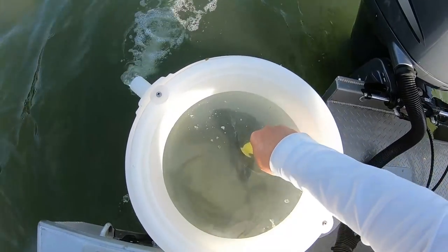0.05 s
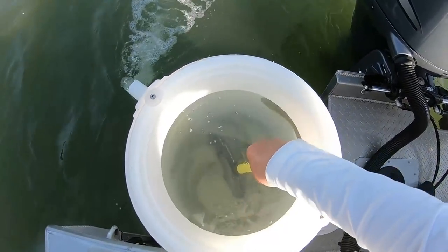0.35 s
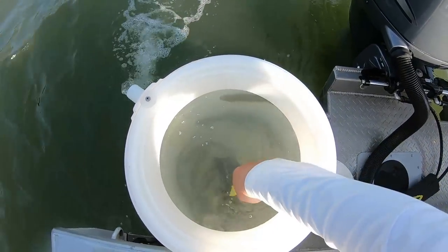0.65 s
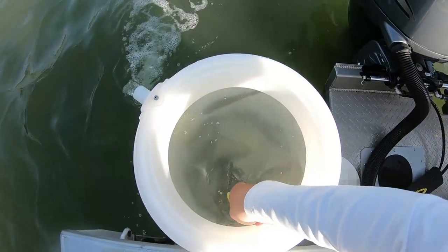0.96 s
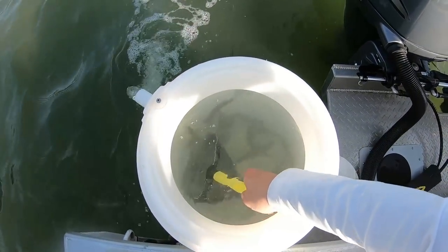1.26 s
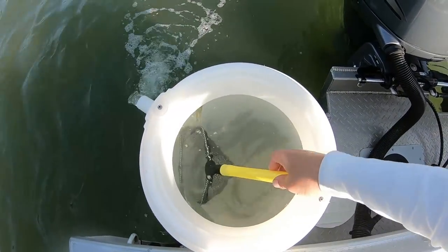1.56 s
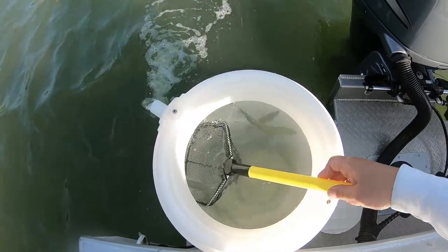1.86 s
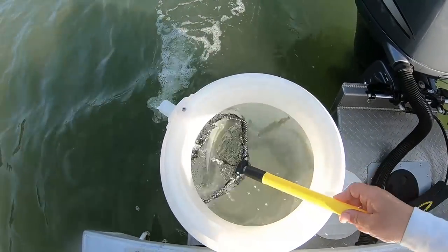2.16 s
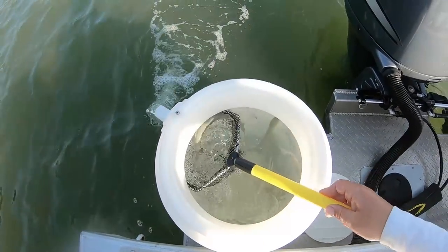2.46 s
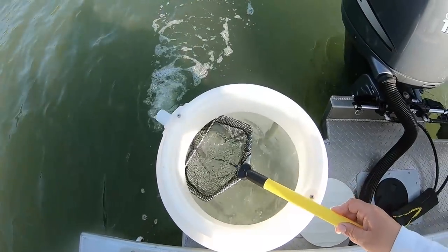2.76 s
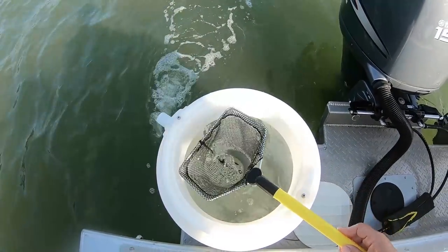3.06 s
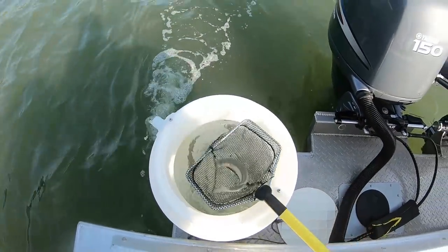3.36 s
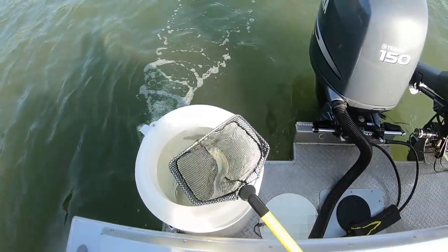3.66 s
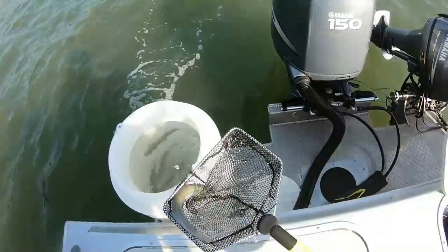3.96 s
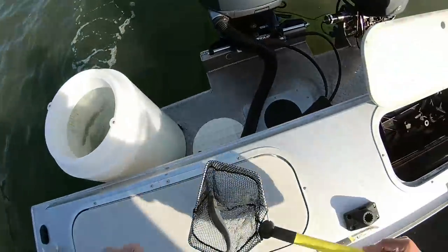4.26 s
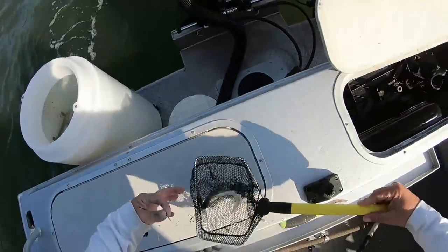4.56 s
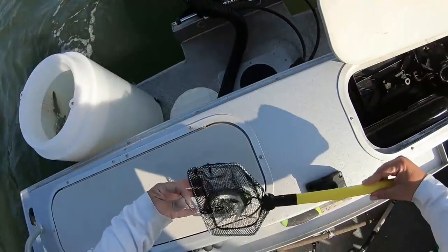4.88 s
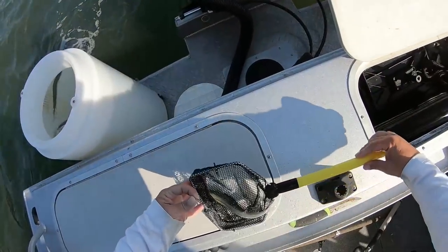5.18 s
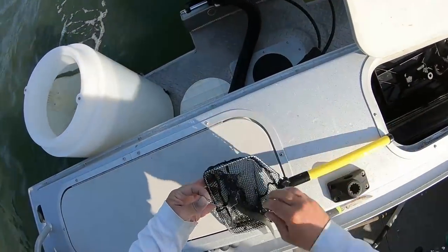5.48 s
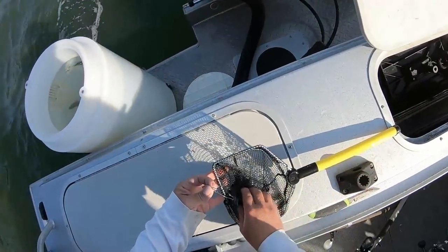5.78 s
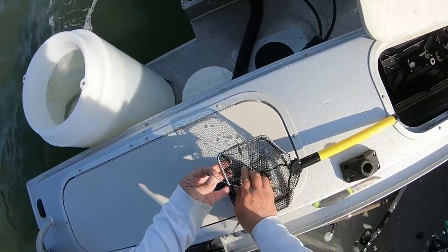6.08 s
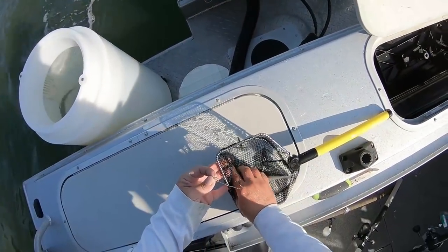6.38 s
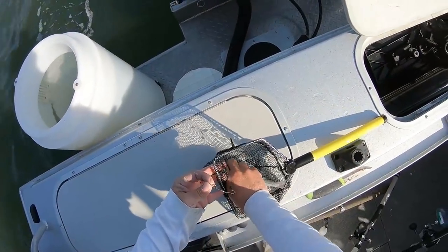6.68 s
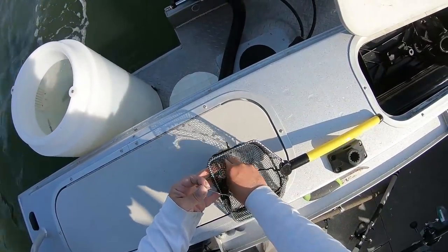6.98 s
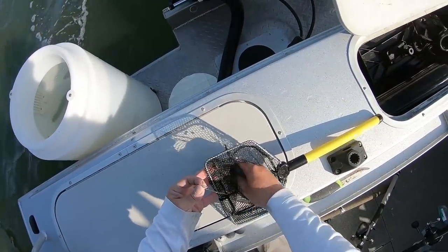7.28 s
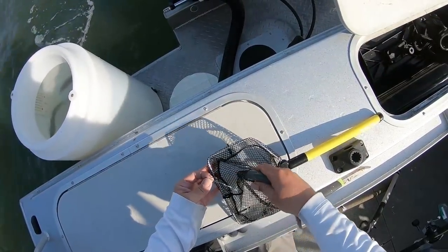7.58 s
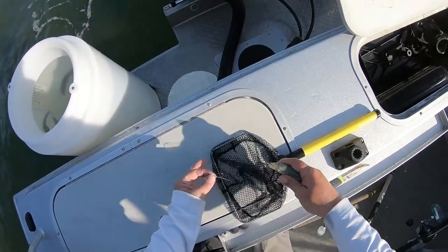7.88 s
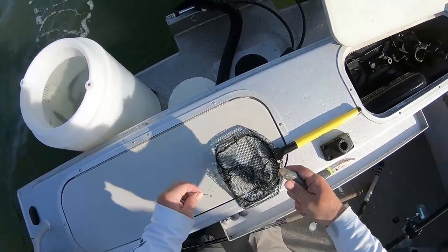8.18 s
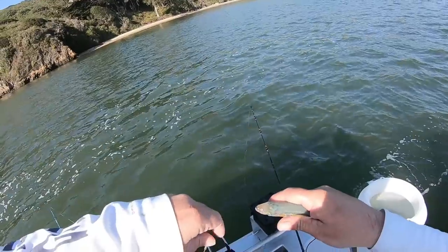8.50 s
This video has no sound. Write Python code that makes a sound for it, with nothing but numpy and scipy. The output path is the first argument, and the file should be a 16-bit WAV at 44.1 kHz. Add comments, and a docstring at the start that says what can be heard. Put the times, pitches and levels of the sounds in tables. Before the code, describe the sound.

Boat engines idle with a low hum that slowly swells and fades, and wind gusts on the microphone. Close by, a hand net scoops small fish from a bait bucket with splashes, drips and little plops. After about four seconds the water settles. The net clicks, rustles and knocks on the hollow deck, and the hull thumps softly twice, over faint lapping and the patter of the bucket's overflow.

```python
"""Two boat engines idle at nearly the same speed, so their hum beats; wind buffets the microphone,
water laps on the hull and the overflow of a bait bucket patters into the sea. From the first moment
a hand net scoops small fish from the bucket: drops splash, trapped air plops and the net knocks the
bucket once. After four seconds the water settles; the net clicks, rustles and knocks on the resonant
deck, and the hull thumps softly twice. A smooth hiss of open water enters at the very end."""
import sys
import numpy as np
from scipy import signal
from scipy.fft import rfft, irfft, next_fast_len
from scipy.io import wavfile
from scipy.ndimage import map_coordinates

SR = 44100
rng = np.random.default_rng(int(sys.argv[2]) if len(sys.argv) > 2 else 0)


def transcribe(u):
    """Save the signal u as a 16-bit wav file named by the first command-line argument.

    u: samples, shape (n,) or (channels, n), limited to [-1, 1]; the rate is SR.
    q: integer samples, one column per channel.
    """
    v = np.clip(np.atleast_2d(u).T, -1, 1)
    q = np.round(v * 32767).astype(np.int16)
    wavfile.write(sys.argv[1], SR, q)


N = 385434

# partials of the exhaust hum: firing_multiple, level_db
HUM_PARTIALS = [(.6667, -21), (1, 1.05), (1.6667, -15.5), (2, -14), (3, -21.5), (5, -32.5), (5.3333, -37),
                (6.3333, -43.5)]
# lulls of the hum, where the engines are half a firing cycle apart: time_s
HUM_LULLS = [-.7, .77, 2.04, 3.5, 4.68, 6.19, 7.72, 9.3]
# gusts over the breeze: start_s, hold_s, rise_db
GUSTS = [(0.605, 0.073, 10), (0.978, .06, 8.5), (1.62, 0.015, 11.5), (2.27, 0.32, 7.5), (3.612, 0.55, 11)]
# spectrum of the wind's eddies: frequency_hz, gain_db
EDDY_SPECTRUM = [(15, -14), (35, -1), (90, 3.5), (160, -0.5), (240, -12), (350, -19), (1200, -80)]
# how much the water is stirred close by: time_s, share (0-1)
STIRRING = [(0, 0.85), (2.3, 0.83), (3.4, 0.93), (3.9, 0.42), (4.4, 0.28), (8.74, 0.24)]
# water lapping on the hull: time_s, level_db
LAPPING_LEVELS = [(4.4, -48), (5.1, -45), (5.7, -47.5), (6.3, -44.5), (7.1, -47), (7.7, -45.5)]
# spectrum of the lapping: frequency_hz, gain_db
LAPPING_SPECTRUM = [(150, -26), (304, -2), (500, -5.5), (740, -4), (1340, -11.5), (1600, -16), (3000, -68)]
# the net drags air under: centre_s, length_s, rise_db
GURGLES = [(0.303, 0.054, 3), (1.877, 0.32, 2.5), (2.415, 0.16, 8)]
# the net breaks the surface and sheds water: centre_s, length_s, rise_db
SPRAY_SURGES = [(1.202, 0.16, 3), (1.818, 0.039, 6), (1.991, 0.052, 4.5), (2.345, 0.28, 6.5),
                (2.843, 0.037, 5), (2.949, 0.022, 5.5), (3.36, 0.067, 7)]
# spectrum of the overflow: frequency_hz, gain_db
OVERFLOW_SPECTRUM = [(590, -21), (1150, -9), (1360, -3), (2010, -1), (3300, -4.5), (3790, 1.5), (4190, 0.5),
                     (4870, -10), (5750, -11.5), (7320, -22), (9520, -40.5), (16100, -61.5)]
# spectrum of near splashes, with the recorder's faint treble peak at 13 kHz: frequency_hz, gain_db
SPLASH_SPECTRUM = [(710, -40), (1200, -17), (1900, -11), (2780, -17), (4090, 0.5), (5050, -2.5),
                   (5880, -6.5), (7320, -29), (11000, -50), (13000, -38), (16100, -58)]
# drops from the wet mesh: start_s, level_db, pitch_hz, deep_splash_relative_db
DROPS = [(0.1515, -20.5, 4700, -13), (0.2040, -22.5, 4100, -15), (0.259, -22.5, 3720, -11),
         (0.3296, -21, 4330, -15), (0.3690, -20, 3870, -21), (0.539, -18, 4810, -35),
         (.569, -23, 4970, -25), (0.6692, -13, 4920, -28), (0.7669, -22.5, 4870, -33),
         (1.092, -23, 3900, -14), (1.356, -21, 4790, -22), (1.496, -22, 4300, -20), (1.711, -23, 4800, -11),
         (1.896, -22, 4100, -6), (2.0943, -19, 3900, -20), (2.2510, -22, 4170, -27),
         (2.307, -19, 4300, -30), (2.3173, -15, 5070, -26), (2.5247, -19.5, 4240, -11),
         (2.6325, -16, 2850, -24), (3.012, -21, 4800, -25), (3.1265, -17, 4270, -24),
         (3.1353, -16, 4380, -21), (3.2638, -19, 4500, -37), (3.5884, -23, 5480, -24),
         (3.652, -19.5, 4470, -33), (3.751, -27, 4020, -18), (3.79, -26, 4320, -29),
         (4.049, -26, 5450, -34), (4.2054, -22.5, 5650, -31)]
# filter on the drops: frequency_hz, gain_db
DROP_SPECTRUM = [(100, -11.5), (1500, -10.5), (3500, 3.5), (5600, 6), (7000, -9.5), (8500, -30.5),
                 (13000, -45.5), (16000, -59)]
# plops in the bucket, and one short knock of the net against it (the two rows near 0.89 s):
# start_s, level_db, pitch_hz, glide_octaves_per_s, t60_s
PLOPS_AND_KNOCK = [(.654, -37, 1745, -10, .1), (0.887, -24.5, 1103, -30.5, 0.044),
                   (.891, -27, 750, -9, 0.13), (1.044, -31, 1560, 14, 0.044),
                   (1.736, -31.5, 670, -13, 0.08), (1.933, -35, 773, 10, 0.07),
                   (1.927, -37, 1850, -13.5, 0.15), (2.23, -28, 587, -22, 0.12), (2.373, -32, 842, -2, .14),
                   (2.4453, -25, 2110, -19, 0.031), (2.452, -28, 1160, -15, 0.042),
                   (3.112, -22.5, 930, -44, 0.04), (3.137, -22, 840, 45, 0.032),
                   (3.2147, -19, 1270, -26, 0.022), (3.2165, -21, 863, -10, 0.053),
                   (3.356, -29.5, 700, 18, 0.046), (6.97, -36, 713, 0, 0.15)]
# fingers catch the net's frame and mesh: start_s, level_db
CLICKS = [(4.705, -13), (4.831, -22), (5.074, -26), (5.560, -27), (8.36, -30)]
# spectrum of a plastic snap: frequency_hz, gain_db
CLICK_SPECTRUM = [(1800, -21), (3600, 3.5), (5600, -0.5), (7000, -8), (8500, -34), (16000, -50.5)]
# fingers and fish work the wet mesh: centre_s, length_s, level_db
RUSTLES = [(5.178, 0.21, -38), (6, 0.064, -33.5), (6.092, 0.032, -35.5), (6.442, 0.4, -41),
           (7.615, 0.097, -43), (7.913, 0.38, -43.5), (8.272, 0.21, -38.5)]
# spectrum of the rustling mesh: frequency_hz, gain_db
MESH_SPECTRUM = [(200, -2.5), (450, -1), (1500, -3), (2800, -7), (4200, 3.5), (6000, -11.5), (8000, -37),
                 (14000, -64)]
# the net strikes the deck: start_s, thud_db, clack_db, place (0 = handle, 1 = hoop)
KNOCKS = [(5.4562, -15, -15.5, 0), (5.462, -21, -24.5, 0), (5.487, -22, -22.5, 0.03),
          (5.888, -31, -30.5, 0.34), (8.031, -21, -15.5, 1), (8.080, -21.5, -21, 1),
          (8.096, -20.5, -30, 0.72)]
# modes of the deck and net frame: pitch_hz, handle_db, hoop_db, t60_s
DECK_MODES = [(238, -26, -1, 0.15), (326, -19, -1, 0.18), (384, -2.5, -4.5, 0.21), (449, 5, 3, 0.077),
              (646, -4.5, -4, 0.13), (874, -4.5, -9, 0.12), (1042, 1, -7.5, 0.077), (1207, -16, -7, 0.085),
              (1375, -20, -4.5, 0.099), (1570, -12.5, -19, .08), (2410, -33, 0, 0.03)]
# spectrum of the contact noise: frequency_hz, gain_db
CLACK_SPECTRUM = [(150, 8.5), (400, 3.5), (1300, -7.5), (2000, -7), (4000, -2.5), (6000, -13.5),
                  (8000, -48.5), (14000, -56.5)]
# thumps in the hull: start_s, level_db, pitch_hz, t60_s
HULL_THUMPS = [(5.573, -15.5, 244, 0.033), (7.44, -14.5, 122, 0.15)]
# spectrum of open water: frequency_hz, gain_db
RIPPLE_SPECTRUM = [(500, -23), (2000, -9.5), (3700, 6), (5400, 5.5), (6500, -24), (10000, -41.5)]

FIRING_HZ, PULL = 60.05, 0.18  # pull (0-1): the engines linger in step and hurry through each lull
BREEZE_DB, GUST_ATTACK_S, GUST_RELEASE_S = -36, 0.069, 0.19
CALM_SPRAY_DB, STIRRED_RISE_DB = -46.5, 5
HOOP_DAMPING = 0.1  # share by which the soft-rimmed hoop shortens the deck's ring
BAND_LIMIT_HZ = 15700


def amp(db):
    """Decibels to amplitude ratio."""
    return 10 ** (np.asarray(db) / 20)


def unit(x):
    """Normalise to rms 1."""
    return x / np.sqrt(np.mean(x ** 2) + 1e-20)


def curve(points):
    """Linear interpolation of (time_s, value) points at every sample."""
    return np.interp(np.arange(N) / SR, *np.transpose(points))


def wobble(rate):
    """Smooth random modulation: a spline through rate knots a second."""
    steps = np.arange(0, N + 100, 100)
    knots = rng.standard_normal(int(N * rate / SR) + 4)
    return np.interp(np.arange(N), steps, map_coordinates(knots, [steps * rate / SR]))


def swell(s, length):
    """A raised-cosine envelope centred on time s, length seconds wide at half height."""
    return np.cos(np.pi / 2 * np.clip((np.arange(N) / SR - s) / length, -1, 1)) ** 2


def fade(t, t60):
    """Exponential decay of 60 dB in t60 seconds."""
    return np.exp(-np.log(1000) * t / t60)


def churn(width_hz, size):
    """Complex random modulation of rms 1, which broadens a pure tone into a narrow band."""
    hz = np.fft.fftfreq(size, 1 / SR)
    flutter = np.fft.ifft(np.exp(2j * np.pi * rng.random(size) - (hz / width_hz) ** 2))
    return flutter / np.sqrt(np.mean(np.abs(flutter) ** 2))


def colour(x, points, size=8192):
    """Minimum-phase filter through (frequency_hz, gain_db) points."""
    hz, db = np.transpose(points)
    gain = amp(np.interp(np.log(np.fft.rfftfreq(size, 1 / SR) + 1), np.log(hz), db))
    cepstrum = irfft(np.log(gain))
    cepstrum[1:size // 2] *= 2
    cepstrum[size // 2 + 1:] = 0
    return signal.oaconvolve(x, irfft(np.exp(rfft(cepstrum))))[:N]


def add(track, s, sound):
    """Superpose a sound on a track at time s."""
    start = round(s * SR)
    track[start:start + len(sound)] += sound[:N - start]


def engines():
    """Beating: two nearly equal exhaust hums interfere, so their sum swells and fades."""
    t = np.arange(N) / SR
    slip = np.interp(t, HUM_LULLS, np.arange(len(HUM_LULLS)) - .5)  # one cycle from lull to lull
    lag = slip - PULL * np.sin(2 * np.pi * slip) / (2 * np.pi)
    cycles = FIRING_HZ * t + 0.025 * wobble(5)
    hum = np.zeros(N)
    for multiple, db in HUM_PARTIALS:
        order = round(3 * multiple) / 3  # exact thirds of the firing rate
        offset = rng.random()
        first = np.sin(2 * np.pi * (order * cycles + offset))
        second = np.sin(2 * np.pi * (order * (cycles - lag) + offset))
        hum += amp(db + 0.69 * wobble(10)) * (first + 0.88 * second)
    return amp(-24.0) * hum


def wind():
    """Turbulence: eddies make low pressure noise at the microphone; gusts build, hold and die."""
    gust_db = np.zeros(N)
    for s, hold, db in GUSTS:
        corners = s + np.cumsum([0, GUST_ATTACK_S, hold, GUST_RELEASE_S])
        gust_db += np.interp(np.arange(N) / SR, corners, [0, db, db, 0])
    eddies = unit(colour(rng.standard_normal(N), EDDY_SPECTRUM))
    return amp(BREEZE_DB + gust_db + 1.6 * wobble(22)) * eddies


def bubbles(low_hz, high_hz, cycles, spread_db, count, size):
    """Bubble resonance: a cloud of damped oscillators, each rising in pitch; the sum has rms 1."""
    when, pitch, strength, life = rng.random((count, 4), dtype=np.float32).T[:, :, None]
    hz = low_hz + (high_hz - low_hz) * pitch
    t60 = cycles * (.5 + life) / hz
    t = np.arange(size, dtype=np.float32) / SR
    gain = amp(-spread_db * np.log(strength + 0.01)) / np.sqrt(t60)
    rings = gain * fade(t, t60) * np.sin(2 * np.pi * hz * t * (1 + 0.11 * t / t60))
    samples = (when * N).astype(int) + np.arange(size)
    return unit(np.bincount(samples.ravel(), rings.ravel(), N)[:N])


def slosh(stir):
    """Air entrainment: the net drags under bubbles that ring, over water lapping on the hull."""
    lapping_db = curve(LAPPING_LEVELS) + 0.66 * wobble(10)
    lapping = amp(lapping_db) * unit(colour(rng.standard_normal(N), LAPPING_SPECTRUM))
    gurgle = amp(-49.0) * bubbles(330, 1083, cycles=14, spread_db=4.0, count=700, size=1600)
    tinkle = amp(-48.0) * bubbles(1300, 2900, cycles=40, spread_db=3.0, count=2600, size=1200)
    air_db = sum(db * swell(s, length) for s, length, db in GURGLES)
    return lapping + stir * amp(air_db) * (gurgle + tinkle)


def spray(stir):
    """Incoherent summation: tiny bubbles merge into the overflow's fizz and the net's spatter."""
    surge_db = sum(db * swell(s, length) for s, length, db in SPRAY_SURGES)
    spray_db = CALM_SPRAY_DB + STIRRED_RISE_DB * stir + surge_db
    fizz = bubbles(2600, 6500, cycles=50, spread_db=2.2, count=4000, size=400)
    fizz += 1.9 * rng.standard_normal(N)
    patter = bubbles(1100, 9000, cycles=32, spread_db=3.3, count=12000, size=240)
    patter += 0.75 * rng.standard_normal(N)
    overflow = amp(1.5 + 1.5 * wobble(25)) * unit(colour(fizz, OVERFLOW_SPECTRUM))
    splashes = amp(2.1 + 1.8 * wobble(26)) * unit(colour(patter, SPLASH_SPECTRUM))
    # stirring shifts the power from the overflow to the near splashes
    return amp(spray_db) * (np.sqrt(1 - 0.99 * stir) * overflow + np.sqrt(stir) * splashes)


def drops():
    """Drop impact: each ticks, rings a tiny bubble, opens a deeper splash and scatters droplets."""
    track, t = np.zeros(N), np.arange(SR // 16) / SR
    attack = 1 - np.exp(-t / 0.00035)
    for s, db, ring_hz, deep_db in DROPS:
        tick, scatter = rng.standard_normal((2, len(t)))
        impact = 1.15 * tick * fade(t, 0.0073) + 0.28 * scatter * fade(t, 0.05)
        ring = np.sin(2 * np.pi * ring_hz * t * (1 + 3 * t)) * fade(t, 0.018)
        deep = np.real(churn(width_hz=470, size=len(t)) * np.exp(2j * np.pi * 1900 * t)) * fade(t, 0.04)
        splat = impact + 0.36 * ring + amp(deep_db + 6.0) * deep
        add(track, s, amp(db + 3.0) * splat * attack)
    return colour(track, DROP_SPECTRUM)


def plops_and_knock():
    """Resonance: air pockets ring and glide as they open or close; the net knocks the bucket once."""
    track, t = np.zeros(N), np.arange(SR // 6) / SR
    attack = 1 - np.exp(-t / 0.0006)
    for s, db, hz, glide, t60 in PLOPS_AND_KNOCK:
        octaves = np.clip(glide * t, -.7, .7)
        phase = 2 * np.pi * np.cumsum(hz * 2 ** octaves) / SR
        roughness = 1 + 0.6 * churn(width_hz=480, size=len(t))
        note = np.imag(roughness * np.exp(1j * phase))
        add(track, s, amp(db) * note * fade(t, t60) * attack)
    return track


def net_clicks():
    """Impulse response: hard plastic, caught by the fingers, gives a heavily damped snap."""
    track, t = np.zeros(N), np.arange(SR // 25) / SR
    ring = np.sin(2 * np.pi * 4150 * t) * fade(t, 0.0058)
    for s, db in CLICKS:
        crack, rattle = rng.standard_normal((2, len(t)))
        snap = ring + 1.4 * crack * fade(t, 0.013) + 0.32 * rattle * fade(t, 0.041)
        add(track, s, amp(db + 0.5) * snap)
    return colour(track, CLICK_SPECTRUM)


def mesh_rustle():
    """Stick-slip friction: strands catch and slip in dry ticks as the hand gropes for a fish."""
    effort = sum(amp(db) * swell(s, length) for s, length, db in RUSTLES)
    slips = (rng.random(N) < 330 / SR) * amp(4 * rng.standard_normal(N))  # about 330 a second
    t = np.arange(SR // 40) / SR
    strands = signal.oaconvolve(slips, fade(t, 0.034))[:N] * rng.standard_normal(N)
    catches = amp(3.5 * wobble(35))
    return effort * unit(catches * colour(strands, MESH_SPECTRUM))


def deck_knocks():
    """Modal vibration: the handle rings the hollow deck with a woody note, the hoop more dryly."""
    thuds, clacks, t = np.zeros(N), np.zeros(N), np.arange(SR // 6) / SR
    attack = 1 - np.exp(-t / 0.0013)
    clack_decay = fade(t, 0.016) + 0.44 * fade(t, 0.11)
    for s, thud_db, clack_db, place in KNOCKS:
        for hz, handle_db, hoop_db, t60 in DECK_MODES:
            mode_db = np.interp(place, [0, 1], [handle_db, hoop_db])
            decay = fade(t, t60 * (1 - HOOP_DAMPING * place))
            cluster = np.exp(2j * np.pi * rng.random()) + 0.7 * churn(width_hz=100, size=len(t))
            ring = np.real(cluster * np.exp(2j * np.pi * hz * t)) * decay * attack
            add(thuds, s, amp(thud_db + mode_db - 5.0) * ring)
        add(clacks, s, amp(clack_db + 5.5) * rng.standard_normal(len(t)) * clack_decay)
    return thuds + colour(clacks, CLACK_SPECTRUM)


def hull_thumps():
    """Damped oscillation: each thump in the hull is one low mode with a soft onset."""
    track, t = np.zeros(N), np.arange(SR // 6) / SR
    attack = 1 - np.exp(-t / 0.0028)
    for s, db, hz, t60 in HULL_THUMPS:
        add(track, s, amp(db) * np.sin(2 * np.pi * hz * t) * fade(t, t60) * attack)
    return track


def ripples():
    """Band-limited noise: open water hisses smoothly in the last moments."""
    hiss_db = curve([(8.44, -100), (8.5, -44), (8.74, -48.5)])
    return amp(hiss_db) * unit(colour(rng.standard_normal(N), RIPPLE_SPECTRUM))


def scene():
    """Superposition in a free field: the direct sounds of nearby sources add in one channel."""
    stir = curve(STIRRING)
    water = slosh(stir) + spray(stir) + drops() + plops_and_knock() + ripples()
    net = deck_knocks() + net_clicks() + mesh_rustle()
    return (engines() + wind() + water + net + hull_thumps())[None]


def record(dry):
    """Ideal low-pass filtering: nothing above the band limit remains."""
    size = next_fast_len(N + SR // 4)
    passband = np.fft.rfftfreq(size, 1 / SR) < BAND_LIMIT_HZ
    return irfft(rfft(dry, size) * passband, size)[:, :N]


dry = scene()
out = record(dry)
transcribe(out)
```